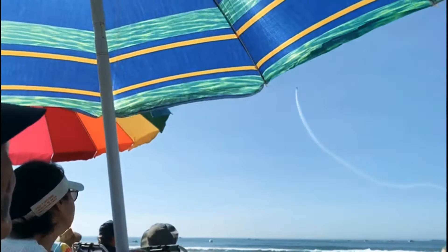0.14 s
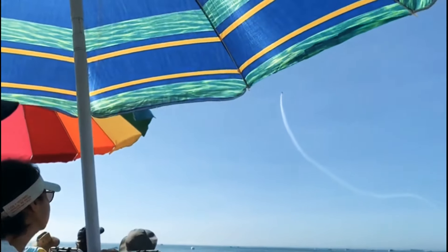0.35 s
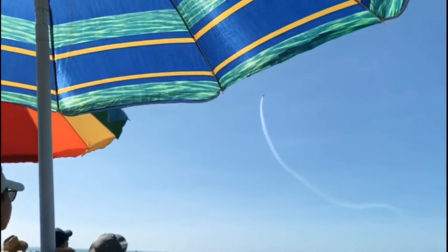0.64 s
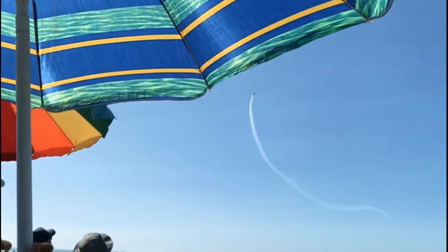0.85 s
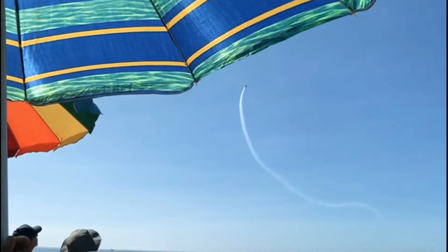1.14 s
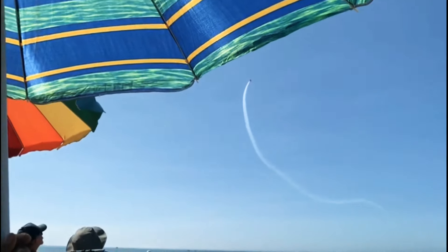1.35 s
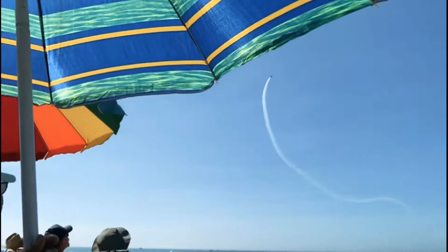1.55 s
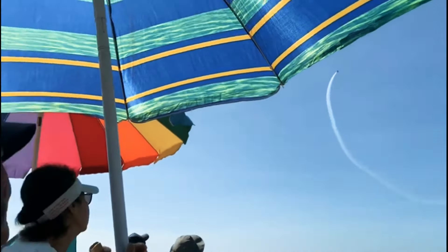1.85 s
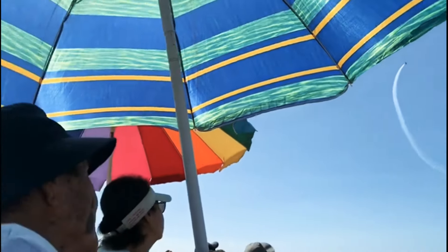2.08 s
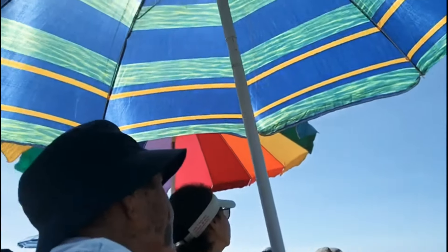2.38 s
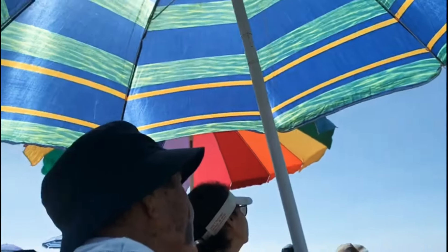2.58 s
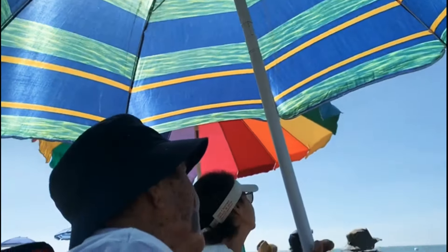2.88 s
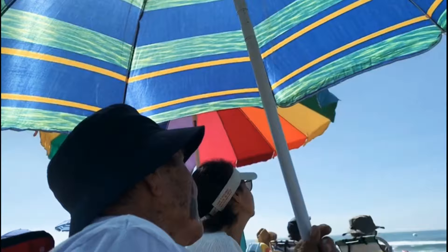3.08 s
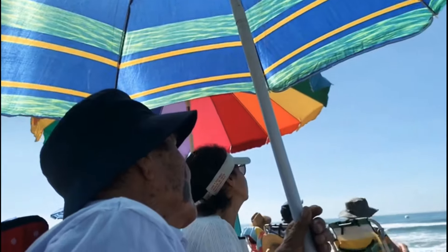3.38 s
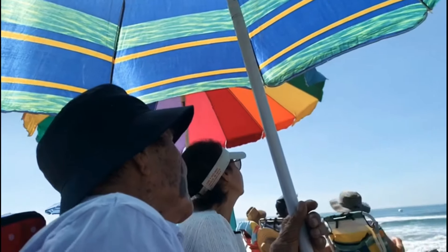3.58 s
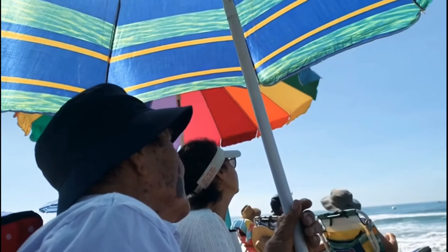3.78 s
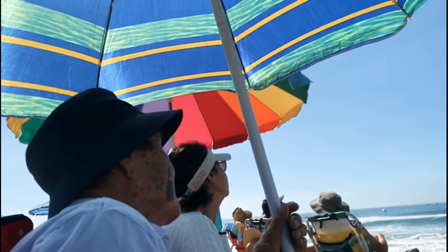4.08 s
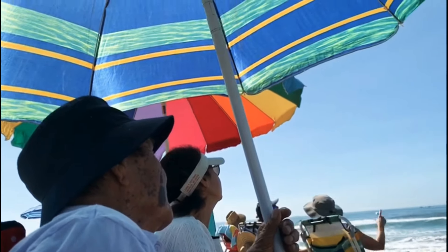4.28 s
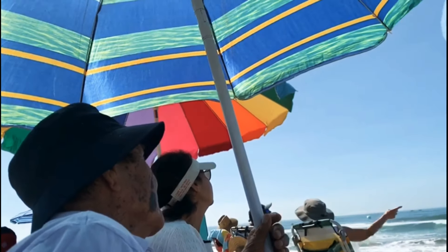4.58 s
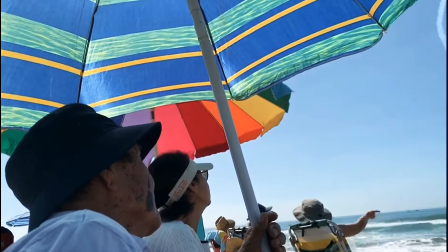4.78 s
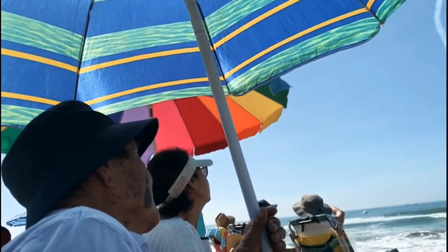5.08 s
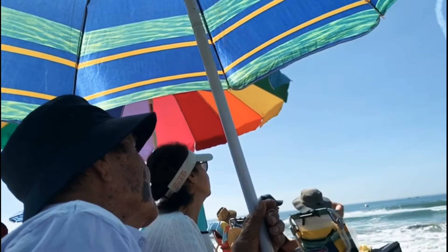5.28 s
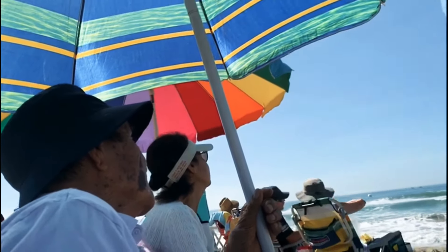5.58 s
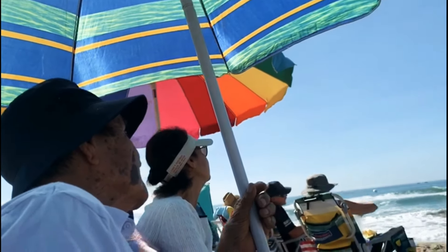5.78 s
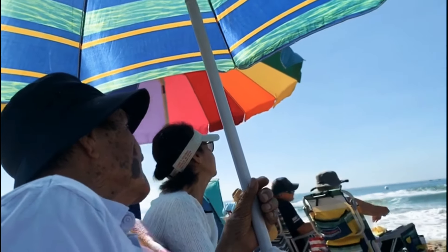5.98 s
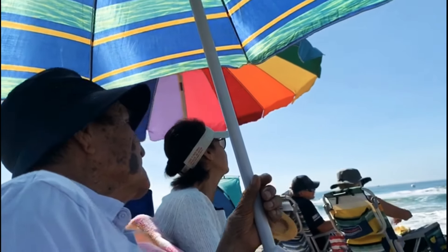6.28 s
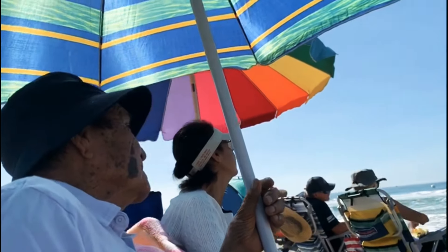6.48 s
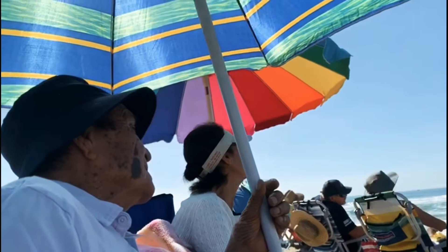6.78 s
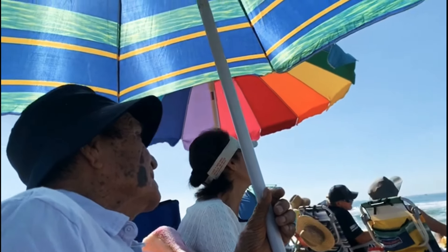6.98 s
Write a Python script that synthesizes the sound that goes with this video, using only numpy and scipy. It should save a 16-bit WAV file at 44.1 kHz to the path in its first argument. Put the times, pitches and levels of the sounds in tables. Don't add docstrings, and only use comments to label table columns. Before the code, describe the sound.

A small propeller plane's low drone holds steady, then dives closer, growing louder, brighter and slightly higher over soft surf and thudding breakers.

```python
import sys
import numpy as np
from scipy import signal
from scipy.fft import rfft, irfft, next_fast_len
from scipy.io import wavfile
from scipy.ndimage import uniform_filter1d

SR = 44100
rng = np.random.default_rng(int(sys.argv[2]) if len(sys.argv) > 2 else 0)


def persist_wave(psi):
    counts = np.round(np.clip(psi, -1, 1) * 32767).astype(np.int16)
    wavfile.write(sys.argv[1], SR, np.atleast_2d(counts).T)


def gain_from_decibels(decibels):
    exponent = np.asarray(decibels, float) / 20
    return 10 ** exponent


N = 314874

# t/s, blade rate/Hz, nearness/dB, dulling by distance and attitude/dB
FLIGHT = [(0.0, 133.3, -51.5, 12), (0.6, 133.6, -52, 21), (1.0, 133.1, -53.5, 16), (1.5, 133, -51.5, 30),
          (2.0, 132.9, -52.5, 30), (2.6, 133.1, -52, 34), (3.1, 133.1, -47.5, 33), (3.5, 134.1, -47, 24.5),
          (4.0, 135, -44.5, 25.5), (4.4, 136.7, -45, 12), (4.7, 138, -41.5, 11), (5.2, 139.9, -38.5, 9.5),
          (5.7, 142.2, -39, 5.5), (6.2, 144.6, -37.5, 3.5), (6.6, 146.4, -38, 4), (7.14, 149.3, -38.5, 6)]
# crest t/s, pitch f/Hz, level/dB
BREAKERS = [(0.487, 74.6, -45), (1.137, 94, -49.5), (1.242, 73, -47), (1.64, 70, -44), (2.365, 83, -48),
            (2.48, 74, -45), (3.006, 70, -40), (3.232, 83, -44.5), (3.479, 70, -41), (3.676, 94.5, -39.5),
            (3.801, 92, -41.5), (3.969, 74.6, -35.5), (4.194, 65, -39), (4.494, 70, -33),
            (4.848, 92, -37.5), (5.044, 90, -35.5), (5.208, 92, -39), (5.373, 73, -44), (5.564, 94, -33.5),
            (5.727, 67.4, -35), (5.817, 65, -37), (6.056, 88.5, -30.5), (6.146, 86, -37), (6.49, 79, -30),
            (6.614, 78, -32), (6.686, 83, -37), (6.814, 83.5, -38), (7.04, 72.6, -31)]
FAR_DB = -52
COARSE = 8


def in_time(rows):
    s, *columns = np.transpose(rows)
    return [np.interp(np.arange(N) / SR, s, c) for c in columns]


def at_hz(points, hz, column=1):
    points = np.array(points)
    return np.interp(np.log(np.maximum(hz, 1)), np.log(points[:, 0]), points[:, column])


def rms_one(x):
    return x / np.sqrt(np.mean(x ** 2) + 1e-20)


def drift(rate):
    r = np.exp(-80 * np.pi * rate / SR)
    chance = rng.standard_normal(N // 40 + 2002)
    slow = signal.lfilter([1], [1, -2 * r, r * r], chance)[2000:]
    return np.interp(np.arange(N) / 40, np.arange(len(slow)), rms_one(slow))


def coloured(x, gains):
    size = next_fast_len(N)
    return irfft(rfft(x, size) * gains(np.fft.rfftfreq(size, 1 / SR)), size)[..., :N]


def propeller(pose):
    # level/dB, left-right/dB, left lag/rad
    facing = [(-0.5, 2, 0.1), (-0.5, 1.5, -0.35), (1, 0, -0.31), (-3, 3, 0.34), (-7, -9, -1.2), (2, 5, -.2),
              (-2, -4, -0.1), (-34, 7, 0), (-18, 4, 0), (-12, 2, 0), (-6, 8, 0), (-19, -6, 0.093),
              (-37, 4, 0.42)]
    aside = [(-4, 1.5, 0.25), (-0.5, 0, 0.16), (2, 0.5, 0.8), (-4.5, -1, 1.9), (-9.5, -5, 0.5),
             (-0.5, -13.5, 0.23), (-5.5, -27, 1.78), (-3.5, -3, 0.092), (-7.5, -7, 0.31), (-9.5, 3.5, 0.28),
             (-36.5, 8, 9.6), (-18, 1, 2.4), (-19.5, 4, 1.9)]
    further = [(0, 1, .2), (0, 0, .5), (0, 0, 1.5), (-7, -1, 2.0), (-7, -9, 2.6), (0, -3, .5),
               (-3, -1, 1.3), (-7, 1, 1.5), (-8, -4, 1.6), (-14, 0, 3.1), (-15, 0, 1.4), (-25, 0, 2.2),
               (-23, 0, 2.2)]
    phase = (blade_phase() + 0.044 * drift(14.0))[::COARSE]
    levels_db = [level[::COARSE] for level in order_levels()]
    unequal = 1 + 0.08 * np.cos(phase / 3)
    gust = drift(0.91)[::COARSE]
    out = 0
    for k, poses in enumerate(zip(facing, aside, further), start=1):
        columns = np.transpose(poses)
        shade_db, pan_db, lag = [np.interp(pose[::COARSE], [0, 1, 2], column) for column in columns]
        group = np.searchsorted([1, 2, 5], k)
        twinkle_db = 0.25 * k ** 0.5 * (gust + 2.0 * drift(13.2)[::COARSE])
        level_db = levels_db[group] + order_swells(order=k) + shade_db + twinkle_db
        wobble = k * phase + 0.04 * k ** 0.5 * drift(6.0)[::COARSE]
        wobble = wobble - 4.4 * np.log(k) - 2.9
        left_share = 1 / (1 + gain_from_decibels(-pan_db))
        shares = np.array([left_share, 1 - left_share])
        height = 2 * np.sqrt(2) * gain_from_decibels(level_db) * unequal
        out = out + height * shares * np.sin([wobble - lag / 2, wobble + lag / 2])
    return signal.resample_poly(out, COARSE, 1, axis=1)[:, :N]


def blade_phase():
    return 2 * np.pi * np.cumsum(in_time(FLIGHT)[0]) / SR


def order_levels():
    groups = [
        (-39, 0.39, 0.055),
        (-51.5, 1.026, .01),
        (-51.5, 0.94, 0.32),
        (-51.5, 0.95, 1.054),
    ]
    _, near_db, dull_db = in_time(FLIGHT)
    return [far_db + near * (near_db - FAR_DB) - dull * dull_db for far_db, near, dull in groups]


def order_swells(order):
    # t/s, order, level/dB
    swells_and_dips = [(0.0, 1, 1), (0.8, 1, 4.5), (2.1, 1, 3), (2.5, 1, -2), (3.1, 1, -1.5), (3.4, 1, 1.5),
                       (4.0, 1, -5), (4.4, 1, 3), (4.8, 1, 2), (5.0, 1, -5), (5.6, 1, -1.5), (6.2, 1, 2.5),
                       (6.4, 5, -7.5), (6.8, 5, 1.5), (5.5, 6, 0), (6.4, 6, -0.5), (5.4, 9, -1), (6.5, 9, -6),
                       (6.6, 7, 0.5), (6.5, 8, 4.5)]
    width_s = 0.088
    t = np.arange(0, N, COARSE) / SR
    return sum(db * np.exp(-((t - s) / width_s) ** 2 / 2) for s, k, db in swells_and_dips if round(k) == order)


def exhaust():
    # multiple of shaft rate, level/dB
    shaft_lines = [(7, -72), (10, -70), (11, -69), (13, -77), (14, -74), (16, -71), (17, -73), (19, -72),
                   (20, -76)]
    shaft = blade_phase() / 3
    _, near_db, dull_db = in_time(FLIGHT)
    lines = 0
    for n, db in shaft_lines:
        dulled_db = 0.03 * (n - 8) * (dull_db - 10)
        level_db = db - dulled_db + 2 * drift(4.0)
        lines = lines + gain_from_decibels(level_db) * np.sin(n * shaft + n * n + drift(3.0))
    return gain_from_decibels(0.15 * (near_db - FAR_DB)) * lines


def whistle():
    # t/s, pitch f/Hz, level/dB
    glide = [
        (4.08, 715, -80),
        (4.13, 726, -69),
        (4.19, 755, -54),
        (4.25, 810, -57),
        (4.3, 834, -95),
    ]
    pitch_hz, level_db = in_time(glide)
    return np.sqrt(2) * gain_from_decibels(level_db) * np.sin(2 * np.pi * np.cumsum(pitch_hz) / SR)


def booms():
    thump_s = 0.016
    out, t = np.zeros(N), np.arange(N) / SR
    starts = rng.uniform(0, 2 * np.pi, (len(BREAKERS), 1))
    for (s, pitch_hz, db), start in zip(BREAKERS, starts):
        near = slice(max(int((s - 0.1) * SR), 0), int((s + 0.1) * SR))
        age = t[near] - s
        swell = np.exp(-(age / thump_s) ** 2 / 2)
        out[near] += np.sqrt(2) * gain_from_decibels(db) * swell * np.sin(2 * np.pi * pitch_hz * age + start)
    return out


def sea(pose):
    # f/Hz, level/dB per Hz
    rumble_spectrum = [(16, -38), (27, -26), (48, -4.5), (75, 2), (102, -2), (130, -7), (170, -18.5)]
    roar_spectrum = [(100, 3), (170, 1.5), (250, -1.5), (350, -7), (500, -20.5), (800, -25.5), (1300, -19),
                     (2000, -58)]
    wash_spectrum = [(300, -3), (600, -1.5), (1000, -4.5), (1500, -3.5), (2000, -4.5), (2600, -11.5),
                     (3500, -12.5), (5000, -21)]
    fizz_spectrum = [(1500, 3), (2500, 1.5), (3500, -5), (4300, -4.5), (5500, -4), (6300, -3.5),
                     (7000, -0.5), (7800, -5), (10000, -5), (11500, -8), (11900, -23)]
    # crest t/s, level/dB
    far_waves = [
        (0.0, -55),
        (0.6, -54.5),
        (1.08, -59),
        (1.6, -57.5),
        (2.05, -56),
        (3.4, -55.5),
        (4.1, -53),
        (4.9, -49.5),
        (6.1, -45.5),
        (7.14, -48.5),
    ]
    # crest t/s, level/dB
    near_waves = [
        (0.0, -69),
        (3.3, -66.5),
        (4.0, -65),
        (4.83, -63),
        (6.15, -64),
        (7.05, -56.5),
    ]
    bed = gain_from_decibels(-52 + 1.57 * np.arange(N) / SR)
    thumps_db = crests(np.array(BREAKERS)[:, ::2], rise_db_per_s=151, fall_db_per_s=97)
    stirred = gain_from_decibels(thumps_db - 4.5)
    rumble_db = 20 * np.log10(np.hypot(bed, stirred))
    roar_db = -53.5 + 0.82 * (in_time(FLIGHT)[1] - FAR_DB)
    wash_db = crests(far_waves, rise_db_per_s=14.5, fall_db_per_s=8.5)
    fizz_db = crests(near_waves, rise_db_per_s=9.5, fall_db_per_s=4.5)
    rumble = gain_from_decibels(rumble_db + 0.8) * surf_noise(rumble_spectrum, patchy_db=0.7, flicker=7.0, shared=1.0)
    roar = gain_from_decibels(roar_db + 2.5) * surf_noise(roar_spectrum, patchy_db=1.2, flicker=8.0, shared=0.4)
    roar = roar * (1 + 0.17 * np.cos(blade_phase() - 0.7))
    wash = gain_from_decibels(wash_db - 2.0) * surf_noise(wash_spectrum, patchy_db=2.0, flicker=16.0, shared=0.39)
    fizz = gain_from_decibels(fizz_db + 7.5) * surf_noise(fizz_spectrum, patchy_db=0.67, flicker=46.0, shared=0.21)
    return ports(rumble + roar + wash + fizz, pose)


def crests(rows, rise_db_per_s, fall_db_per_s):
    t = np.arange(0, N + 64, 64) / SR
    s, db = np.transpose(rows)[:, :, None]
    swells_db = db + np.minimum(rise_db_per_s * (t - s), fall_db_per_s * (s - t))
    power = gain_from_decibels(2 * swells_db).sum(axis=0)
    return np.interp(np.arange(N) / SR, t, 10 * np.log10(power + 1e-12))


def surf_noise(spectrum, patchy_db, flicker, shared):
    size = next_fast_len(N)
    hz = np.fft.rfftfreq(size, 1 / SR)
    lowest, highest = spectrum[0][0], spectrum[-1][0]
    white = rfft(rng.standard_normal((2, size))) * gain_from_decibels(at_hz(spectrum, hz))
    white *= (hz > lowest) & (hz < highest)
    out, together = 0, drift(flicker / 4)
    for centre in lowest * 2 ** np.arange(0, np.log2(highest / lowest) + 0.5, 0.5):
        share = np.maximum(1 - 2 * abs(np.log2(np.maximum(hz, 1) / centre)), 0)
        swell_db = patchy_db * (shared * together + drift(flicker))
        out = out + irfft(white * share, size)[:, :N] * gain_from_decibels(swell_db)
    return rms_one(out)


def ports(pair, pose):
    # f/Hz, facing, turned aside, left lag when aside/rad
    likeness = [(60, 0.99, 1, 0), (171, 1, 0.99, 0.52), (500, 0.95, 0.82, 1.5), (900, 0.7, -0.057, 2),
                (1480, 0.66, 0.36, 2), (2085, 0.34, 0.53, 3), (2074, 0.6, 0.45, 4.5),
                (3310, -0.2, -0.02, 4.5), (4400, 0.54, 0.36, 6.5), (4800, 0.4, 0.21, 6.5),
                (5660, -0.5, -0.074, 6.5), (6400, 0.95, 0.43, 6.5), (7100, -0.72, 0.3, 6.5)]
    # f/Hz, likeness
    upper = [(7200, .15), (7500, -.3), (7900, -.995), (8900, -.995), (9400, -.8), (9800, .15), (10350, .97),
             (12000, .99)]
    # f/Hz, left-right/dB
    balance_db = [(60, 0.5), (130, 0.5), (350, -2.5), (850, -3), (1500, -0.5), (3500, 1.5), (5700, -6.5),
                  (6700, -3.5), (7600, 4)]
    split_hz = upper[0][0]

    def alike(hz, column):
        joined = np.where(hz < split_hz, at_hz(likeness, hz, column), at_hz(upper, hz))
        return np.clip(joined, -1, 1)

    heard = []
    for column in (1, 2):
        mid = coloured(pair[0], lambda hz: np.sqrt((1 + alike(hz, column)) / 2))
        side = coloured(pair[1], lambda hz: np.sqrt((1 - alike(hz, column)) / 2))
        heard.append(np.array([mid + side, mid - side]))
    lagging = lambda hz: np.exp(-1j * at_hz(likeness, hz, column=3) * (hz < split_hz))
    heard[1][0] = coloured(heard[1][0], lagging)
    turn = np.clip(pose, 0, 1) * np.pi / 2
    both = np.cos(turn) ** 2 * heard[0] + np.sin(turn) ** 2 * heard[1]
    halves = np.array([[0.5], [-0.5]])
    return coloured(both, lambda hz: gain_from_decibels(at_hz(balance_db, hz) * (hz < upper[1][0]) * halves))


def scene():
    # t/s, pose (0 facing the sound, 1 turned aside, 2 turned further)
    swing = [
        (0, 0.021),
        (1.8, 0.14),
        (2.5, 0.95),
        (5.3, 0.87),
        (6.15, 1.23),
        (6.5, 1.965),
        (7.14, 2.02),
    ]
    pose, = in_time(swing)
    return propeller(pose) + exhaust() + whistle() + sea(pose) + booms()


def drop_faint(x, ragged_db):
    # f/Hz, threshold against the local level/dB
    threshold = [(100, -30), (400, -19), (1000, -14), (2000, -8.5), (3300, -5.5), (8000, -6), (11000, -7)]
    window = np.sin(np.pi * (np.arange(2048) + 0.5) / 2048)
    hz, _, bins = signal.stft([x[0] + x[1], x[0] - x[1]], SR, window, nperseg=2048)
    power = uniform_filter1d(abs(bins) ** 2, size=5, axis=1)
    local = uniform_filter1d(power.max(axis=0), size=21, axis=0)
    local = uniform_filter1d(local, size=5, axis=1)
    waver = rng.standard_normal((2, len(hz) // 9 + 1, bins.shape[2]))
    waver = waver.repeat(9, axis=1)[:, :len(hz)]
    waver = rms_one(uniform_filter1d(waver, size=2, axis=2))
    limit_db = at_hz(threshold, hz)[:, None] + ragged_db * waver
    kept = power > local * gain_from_decibels(2 * limit_db)
    mid, side = signal.istft(bins * kept, SR, window, nperseg=2048)[1][:, :N]
    return np.array([mid + side, mid - side]) / 2


def roll_off(x):
    return signal.sosfilt(signal.butter(12, 12410, fs=SR, output="sos"), x)


def record(dry):
    port_hz = 151
    opposite = np.array([[1], [-1]])
    skew = lambda hz: np.exp(-0.2j * opposite * (hz / port_hz) ** 2 / (1 + (hz / port_hz) ** 6))
    mix = drop_faint(coloured(dry, skew), ragged_db=4.5)
    return roll_off(mix)


dry = scene()
out = record(dry)
persist_wave(out)
```